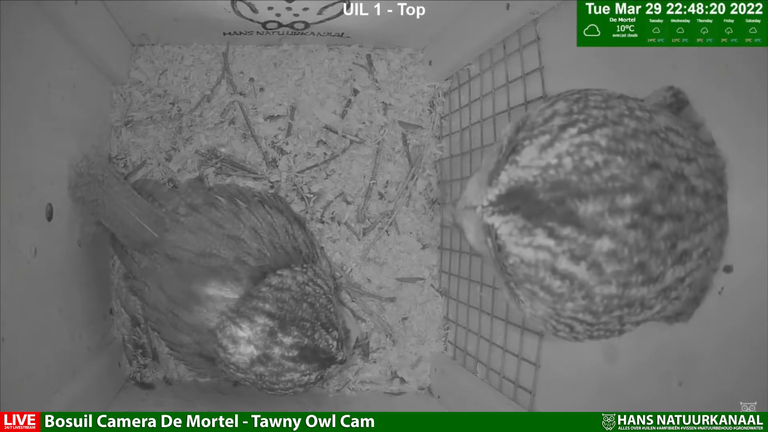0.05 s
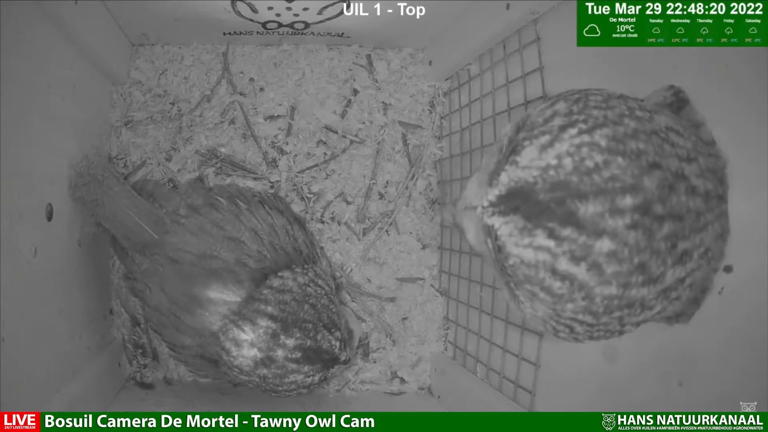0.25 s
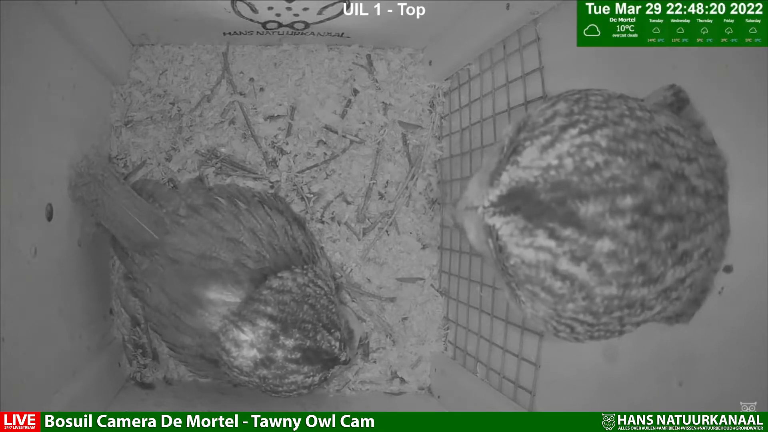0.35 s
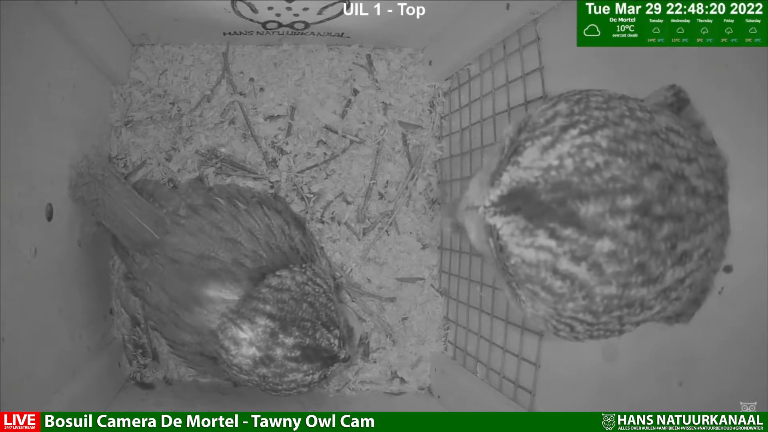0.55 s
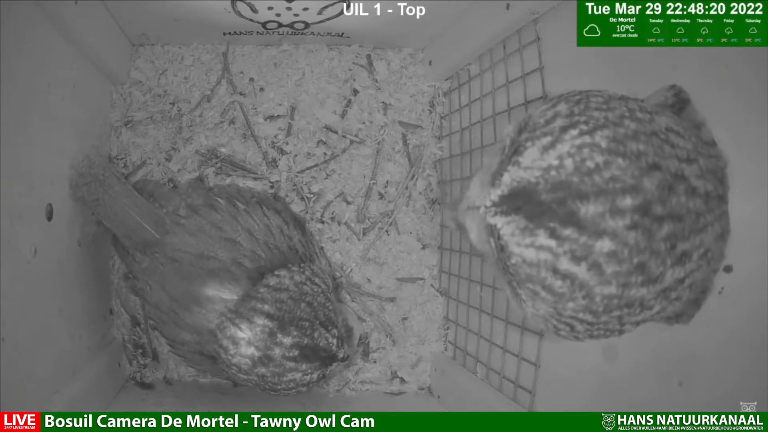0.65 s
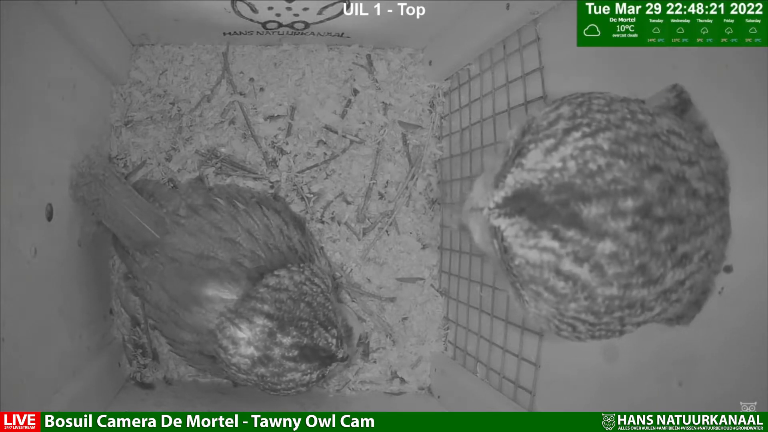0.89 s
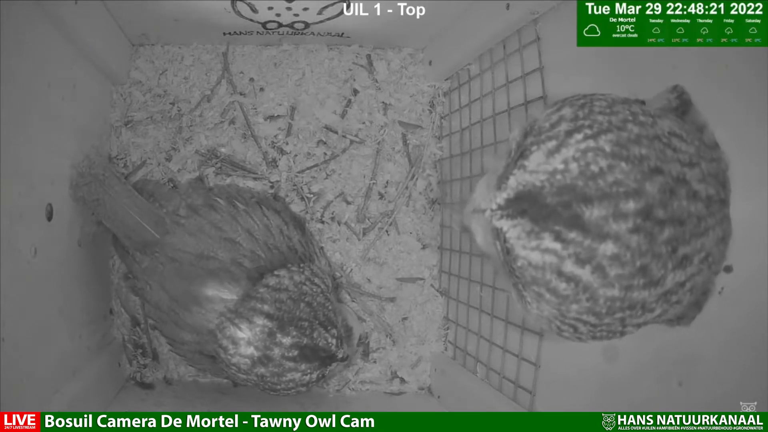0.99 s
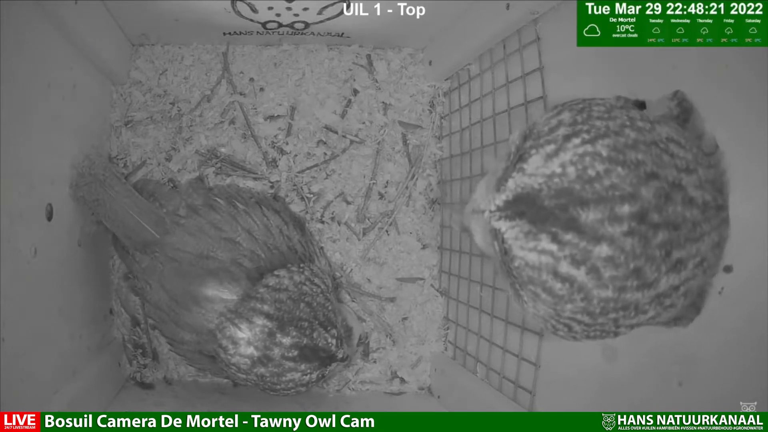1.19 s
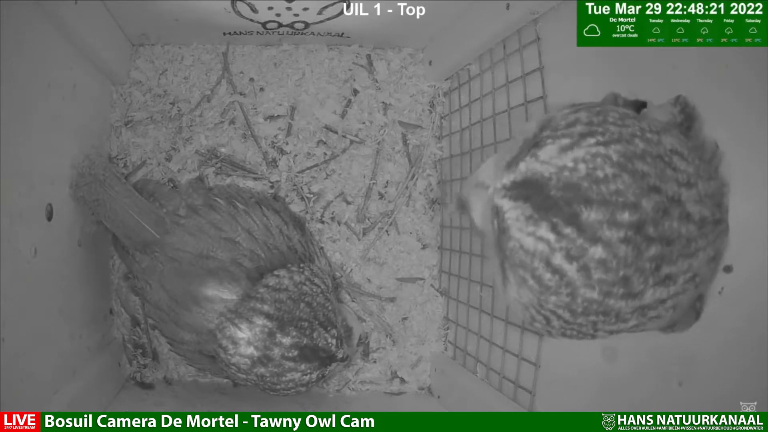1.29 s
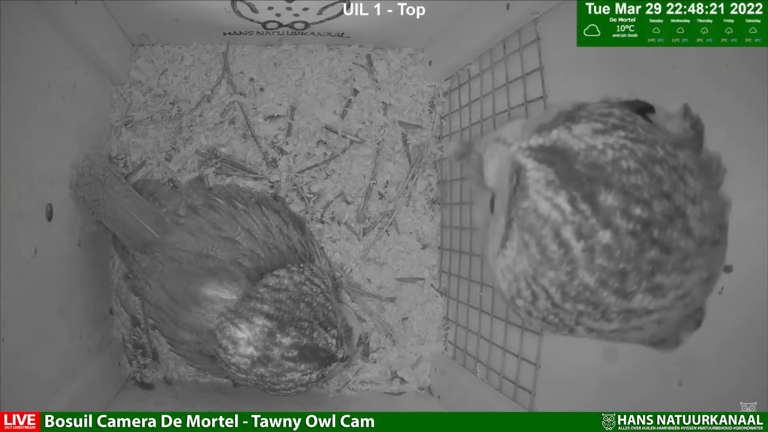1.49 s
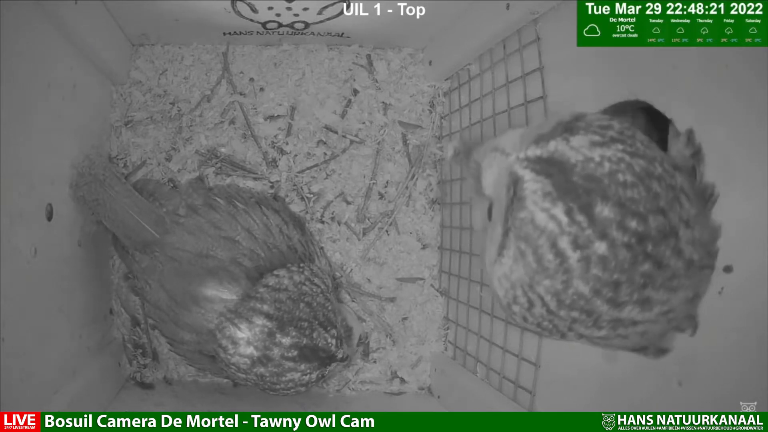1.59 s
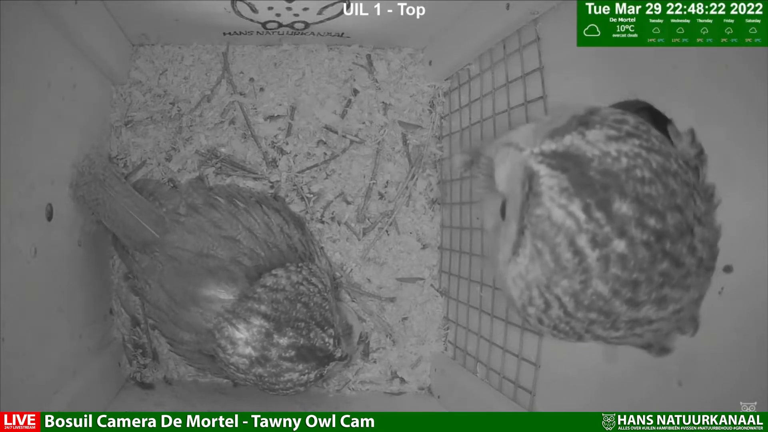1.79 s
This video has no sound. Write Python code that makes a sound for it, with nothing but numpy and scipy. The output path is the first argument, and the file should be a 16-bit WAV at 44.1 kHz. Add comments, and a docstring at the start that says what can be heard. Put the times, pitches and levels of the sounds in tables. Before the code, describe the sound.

A tawny owl gives a loud, shrill shriek, then a softer rising whine.

```python
"""Tawny owls in a nest box.

Inside a wooden box, a small microphone close to the birds. One gives a loud, shrill two-humped shriek,
then comes a softer rising whine that ends in a buzz; a second voice of the syrinx joins each call.
Afterwards an owl shifts with small scratches and a brush of feathers, over faint mains hum and hiss."""
import sys
import numpy as np
from scipy import signal
from scipy.fft import rfft, irfft
from scipy.io import wavfile
from scipy.ndimage import uniform_filter1d

SR = 44100
rng = np.random.default_rng(int(sys.argv[2]) if len(sys.argv) > 2 else 0)


def persist_wave(psi):
    """Save psi, clipped to +-1, as 16-bit WAV."""
    counts = np.round(np.clip(psi, -1, 1) * 32767).astype(np.int16)
    wavfile.write(sys.argv[1], SR, np.atleast_2d(counts).T)


N = 81585
T = np.arange(N) / SR
BIN_HZ = np.fft.rfftfreq(N, 1 / SR)


def amp(db):
    """Decibels to gain."""
    return 10 ** (np.asarray(db) / 20)


def unit(x):
    """Scales to rms 1."""
    return x / np.sqrt(np.mean(x ** 2) + 1e-20)


def value_at(spectrum, hz):
    """Reads a spectrum table on a log-frequency axis."""
    f, value = np.transpose(spectrum)
    return np.interp(np.log(hz + 1), np.log(f), value)


def curves(table):
    """Each column of a time table as a curve, smoothed over 5 ms."""
    times, *columns = np.transpose(table)
    return [uniform_filter1d(np.interp(T, times, column), 220) for column in columns]


def gate(table, attack_s=0.0026, release_s=0.0027):
    """Opens at the first row of a time table and closes at its last."""
    start, end = table[0][0], table[-1][0]
    return np.clip((T - start) / attack_s, 0, 1) * np.clip((end - T) / release_s + .5, 0, 1)


def burst(peak_s, rise_s, decay_s, db):
    """An envelope that rises and decays exponentially around its peak."""
    return amp(db) * np.exp(-np.maximum((peak_s - T) / rise_s, (T - peak_s) / decay_s))


def phase_of(hz):
    """Running phase of a pitch curve."""
    return 2 * np.pi * np.cumsum(hz) / SR


def coloured(x, spectrum):
    """Filters by a spectrum table."""
    return irfft(rfft(x) * amp(value_at(spectrum, BIN_HZ)), N)


def noise(spectrum, modulation=1):
    """White noise, modulated and then coloured, at rms 1."""
    return unit(coloured(rng.standard_normal(N) * modulation, spectrum))


def wobble(hz):
    """Random motion up to a given rate, at rms 1."""
    return unit(irfft(rfft(rng.standard_normal(N)) / (1 + (BIN_HZ / hz) ** 4), N))


def electronics():
    """The noise floor: steady mains hum and microphone hiss."""
    # 50 Hz mains and its harmonics: (frequency [Hz], rms level [dB])
    mains = [(50, -68.5), (150, -76), (200, -93), (250, -85), (350, -87), (450, -88), (550, -91),
             (650, -93.5)]
    # colour of the hiss: (frequency [Hz], gain [dB])
    hiss_colour = [(150, 3), (2000, -13.5), (11800, -18.5), (13000, -29)]
    hum = sum(amp(db) * np.sqrt(2) * np.sin(2 * np.pi * hz * T) for hz, db in mains)
    return hum + amp(-79) * noise(hiss_colour)


def shriek():
    """A bright harmonic voice at close range, whose overtones flutter and break up as the pitch glides."""
    # course of the call: (time [s], pitch [Hz], level [dB], brightness [dB per harmonic])
    contour = [(0.2, 1142, -26.5, -0.1), (0.214, 1486, -14.5, 0.66), (0.226, 1507, -9, 2.38),
               (0.242, 1458, -12.5, 0.67), (0.27, 1296, -16, -0.5), (0.296, 1198, -16.5, -0.34),
               (0.326, 1165, -14, -1), (0.355, 1155, -12.5, 0.65), (0.4, 1173, -11, -0.65),
               (0.44, 1210, -10.5, 1.6), (0.46, 1298, -14, 1.6), (0.486, 1498, -6, 2.19),
               (0.518, 1541, -7.5, 2.0), (0.552, 1491, -4, 3), (0.584, 1470, -7.5, 2.5),
               (0.604, 1506.0, -8.5, 2.08), (0.622, 1488, -9.5, 2), (0.64, 1433, -17.5, 0.8),
               (0.652, 1283, -26, -3.1), (0.67, 1001.0, -38, -13.7)]
    # colour of throat and box: (frequency [Hz], gain [dB])
    colour = [(1000.0, -13.5), (1160.0, -22.5), (1230.0, -35.5), (1330.0, -22.5), (1480.0, -13.5),
              (1560.0, -10), (2300.0, -12), (2650.0, -11), (2950.0, -20), (3090.0, -5.5), (3500.0, -17),
              (3900.0, -10.5), (4300.0, -9), (4500.0, -17.5), (4720.0, -26), (5200.0, -26), (5900.0, -22),
              (7100.0, -24), (7900.0, -32.5), (9200.0, -37.5), (10500.0, -42.5), (12000.0, -55.5),
              (13500.0, -66), (15300.0, -83.5)]
    # flutter on the glides: (time [s], depth [0-1])
    glide_flutter = [(.2, .8), (.222, .45), (.255, .6), (.285, .4), (.31, .04), (.42, .03), (.445, .15),
                     (.472, .65), (.497, .06), (.53, .03), (.59, .04), (.62, .3), (.655, 1)]
    # swells of the strongest harmonics: (time [s], second [dB], third [dB], fourth [dB])
    swells = [(0.225, 2.5, -1.5, 4), (0.26, -5, -5, 1.7), (0.33, 2.05, 9.5, 3.3), (0.44, -1, 4, -6),
              (0.47, -4, -4, 6.5), (0.52, -4.15, 4.5, 5), (0.555, -1, -6, 6), (0.58, 2, 8.5, 3.5),
              (0.615, 1.5, -0.7, 6.5), (0.645, 1, 1.75, 0.5)]
    # colour of the breath noise: (frequency [Hz], gain [dB])
    rasp_colour = [(600, -75), (1300, -20), (6500, -3), (13000, -33)]
    full_effort_db, jitter_hz, break_hz = -7.5, 158, 75
    hz, level, brightness = curves(contour)
    flutter, = curves(glide_flutter)
    swell_db = dict(enumerate(curves(swells), 2))
    phase = phase_of(hz * (1 + 0.008 * flutter * wobble(jitter_hz)))
    voice = np.zeros(N)
    for k in range(1, 13):
        # below full effort the top overtones fade faster
        fade_db = .5 * np.minimum(level - full_effort_db, 0) * np.minimum(k * hz / 14100, 1) ** 4
        wander_db = -0.27 * wobble(hz=26) * min(k / 5, 1.5)  # each harmonic swells and dips on its own
        breakup = .8 * flutter * min(k / 4, 1.2)
        in_phase = np.sin(k * phase) * (1 + breakup * wobble(break_hz))
        quadrature = np.cos(k * phase) * breakup * wobble(break_hz)
        partial = (in_phase + quadrature) / np.sqrt(1 + breakup ** 2)
        timbre_db = value_at(colour, k * hz) + brightness * (k - 2) + swell_db.get(k, 0)
        voice += amp(timbre_db + fade_db + wander_db) * partial
    voice *= 1 + 0.16 * flutter * wobble(jitter_hz)  # shimmer
    rasp = noise(rasp_colour, modulation=1 + np.cos(phase)) * flutter * amp(-30.5)
    return (voice + rasp) * amp(level) * gate(contour)


def near_walls(x):
    """Adds reflections off the near walls: gliding overtones pass through their peaks and notches."""
    # first reflections: (delay [ms], signed gain [ratio])
    reflections = [(0.735, 0.45), (0.907, -0.234), (1.369, 0.199), (1.708, 0.141), (1.849, -0.144),
                   (2.057, -0.127), (2.276, 0.112), (3.357, -0.159), (3.554, 0.122)]
    response = 1 + sum(gain * np.exp(-2j * np.pi * BIN_HZ * ms / 1000) for ms, gain in reflections)
    return irfft(rfft(x) * response, N)


def ring(x, t60s):
    """Dense reflections that die away band by band; t60s is (frequency [Hz], T60 [s])."""
    hz, t, bands = signal.stft(rng.standard_normal(SR // 2), SR, nperseg=128)
    decay = amp(-60 * t / value_at(t60s, hz)[:, None])
    _, tail = signal.istft(bands * decay, SR, nperseg=128)
    return signal.fftconvolve(x, tail / np.linalg.norm(tail))[:N]


def box_echo(x):
    """The short ring of the wooden box around the microphone, and a faint longer echo."""
    # decay of the box: (frequency [Hz], T60 [s])
    box_t60s = [(950, .07), (2500, .04), (6000, .07)]
    return amp(-13) * ring(x, box_t60s) + amp(-52.5) * ring(x, t60s=[(1000, 0.3)])


def undertone():
    """The lower voice of the syrinx, sounding through the dip of the shriek."""
    # course of the lower voice: (time [s], pitch [Hz], level [dB])
    contour = [(.342, 512, -49.5), (.398, 608, -38), (.45, 701, -41), (.482, 634, -50.5)]
    hz, level = curves(contour)
    phase = phase_of(hz)
    tone = np.sin(phase) + amp(-14) * np.sin(2 * phase) + amp(-20.5) * np.sin(3 * phase)
    return tone * amp(level) * gate(contour)


def trailing_breath():
    """The owl's hiss that trails the shriek: a puff, then the last of its air."""
    # colour of the breath: (frequency [Hz], gain [dB])
    colour = [(400, -31), (950, 0), (1400, -10), (7000, -10), (14000, -32.5)]
    puff_s, end_s = 0.55, 0.748
    puff = burst(puff_s, rise_s=.01, decay_s=0.031, db=-56.5)
    sigh = amp(-68) * (T > puff_s) * np.sqrt(np.clip(2 * (end_s - T) / (end_s - puff_s), 0, 1))
    return (puff + sigh) * noise(colour)


def whine():
    """A nearly pure rising tone; where the second voice adds to its swing, the membranes meet and buzz."""
    # course of the call: (time [s], pitch [Hz], level [dB], second harmonic re first [dB])
    contour = [(.796, 663, -42, -8.5), (.82, 700.5, -40, -9.5), (.847, 727.6, -41, -23),
               (.869, 794.2, -39.5, -9.5), (.89, 843, -35, -25), (.933, 861.8, -30.5, -19),
               (.975, 883, -27.5, -23.5), (1.01, 888.4, -25.5, -26.5), (1.035, 935.6, -29, -13.5),
               (1.057, 977, -30, -14), (1.1, 1003, -29.5, -8), (1.15, 1018, -31.5, -8.5),
               (1.163, 993, -32, -10.5), (1.175, 879, -39, -32), (1.188, 836, -66.5, -9)]
    # the second voice: (time [s], level re first voice [dB])
    second_levels = [(1.025, -40.5), (1.048, -22.5), (1.07, -19.5), (1.1, -17.5), (1.148, -20), (1.19, -45)]
    # colour of the membranes' contact: (frequency [Hz], gain [dB])
    contact_colour = [(700, -39), (1280, 2.5), (2300, 12.5), (2750, -1.5), (3320, 7.5), (3600, -11),
                      (6000, -8.5), (8000, -4), (9600, -23.5)]
    # air rasping through the end of the call: (time [s], level [dB])
    air_levels = [(1.03, -90), (1.09, -66), (1.19, -78), (1.21, -92)]
    # colour of that air: (frequency [Hz], gain [dB])
    air_colour = [(500, -15.5), (1800, 1), (8400, -1), (9600, -16)]
    hz, level, overtone_db = curves(contour)
    phase = phase_of(hz * (1 + 0.0027 * wobble(hz=150)))
    upper = sum(amp(-37.5 - 6 * (k - 3)) * np.sin(k * phase) for k in range(3, 7))
    overtones = amp(overtone_db) * (upper - np.cos(2 * phase))
    depth = amp(curves(second_levels)[0]) * gate(second_levels)
    second_hz = .722 * hz * (1 + 0.0044 * wobble(hz=121))
    second_voice = depth * np.sin(phase_of(second_hz))
    swing = np.sin(phase) + second_voice
    overshoot = np.maximum(swing + 0.14 * second_voice * wobble(hz=700) - 1, 0)  # membranes meet at 1
    contact = overshoot * np.sqrt(depth / depth.max())
    air = noise(air_colour) * amp(curves(air_levels)[0]) * gate(air_levels)
    contact *= 1 + 0.28 * rng.standard_normal(N)  # turbulence in each contact
    buzz = ring(coloured(contact, contact_colour), t60s=[(1000, 0.011)])  # smeared by the throat
    tone = (swing + overtones) * gate(contour)
    return (tone + amp(13.5) * buzz) * amp(level) + air


def claws():
    """Claws scratch the litter: bursts of noise, each with one short resonance of a twig or board."""
    # scratches: (time [s], level [dB], decay [s], resonance [Hz])
    scratches = [(1.349, -70, .007, 1017), (1.602, -62.5, 0.025, 665), (1.664, -65, .028, 650),
                 (1.707, -65.5, 0.014, 2340), (1.775, -72, .016, 900)]
    # colour of the litter: (frequency [Hz], gain [dB])
    litter_colour = [(120, -16), (400, -2.5), (2600, -11.5), (3600, -24.5), (14000, -46.5)]
    width_hz = 166
    sound = np.zeros(N)
    for peak_s, db, decay_s, hz in scratches:
        litter = noise(litter_colour)
        pole = np.exp(np.pi * (2j * hz - width_hz) / SR)
        twig = unit(signal.lfilter([1], [1, -pole], litter).real)
        sound += unit(litter + amp(-4.5) * twig) * burst(peak_s, 0.0029, decay_s, db)
    return sound


def feathers():
    """Feathers brush the box in grainy swishes."""
    # brushes: (time [s], rise [s], decay [s], level [dB])
    brushes = [(1.601, 0.0079, .007, -56), (1.631, .003, 0.0061, -69.5), (1.657, 0.014, 0.011, -73)]
    # colour of the feathers: (frequency [Hz], gain [dB])
    colour = [(150, -15.5), (1500, -12.5), (2500, 7), (3300, 2.5), (9300, 1.5), (13500, -30)]
    swishes = sum(burst(*brush) for brush in brushes)
    return swishes * noise(colour, modulation=amp(3.4 * wobble(hz=700)))


def scene():
    """One microphone in the box: the calls and their echo, the owl shifting, and the noise floor."""
    reflected_shriek = near_walls(near_walls(shriek()))  # two rounds off the walls
    calls = reflected_shriek + undertone() + trailing_breath() + whine()
    return (calls + box_echo(calls) + claws() + feathers() + electronics())[None]


def record(dry):
    """The recorder's band limit."""
    lowpass = signal.firwin(511, cutoff=15560, window=("kaiser", 9), fs=SR)
    return signal.oaconvolve(dry, lowpass[None], "same")


dry = scene()
out = record(dry)
persist_wave(out)
```